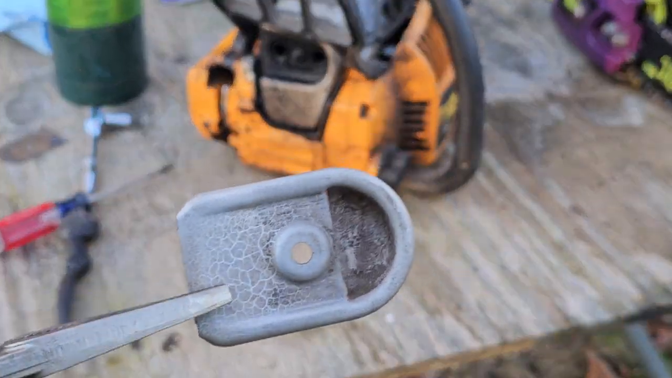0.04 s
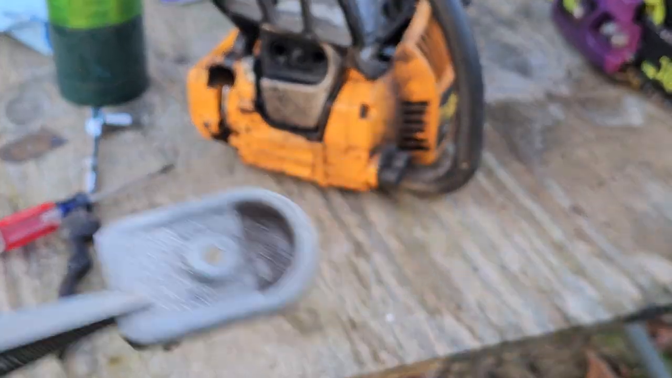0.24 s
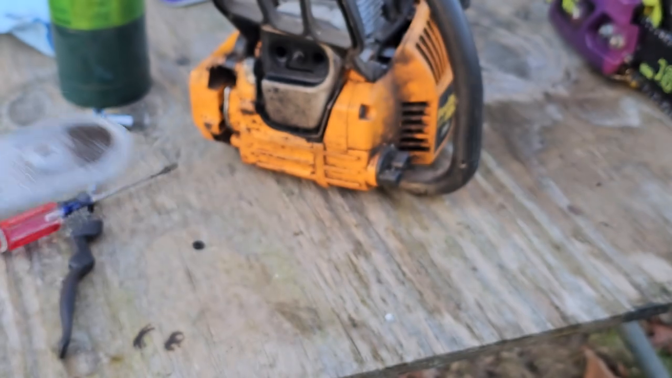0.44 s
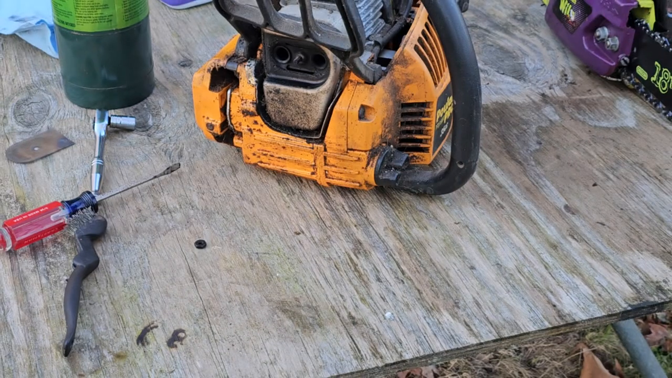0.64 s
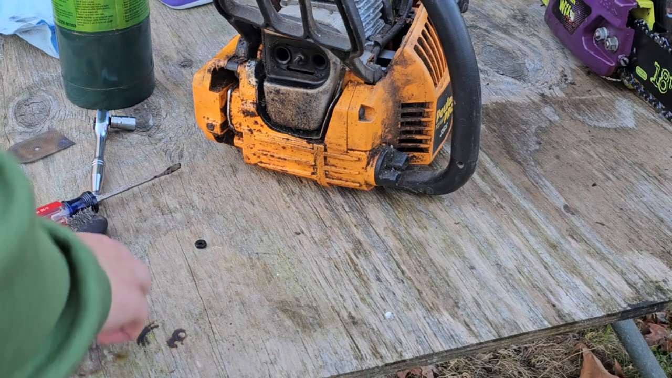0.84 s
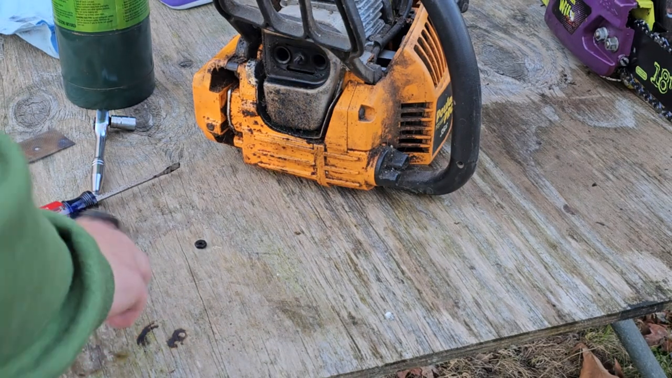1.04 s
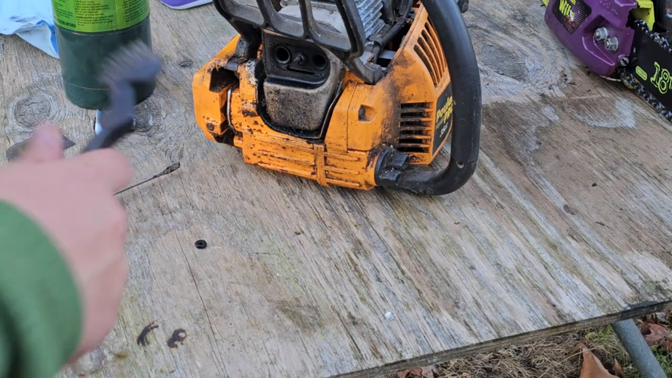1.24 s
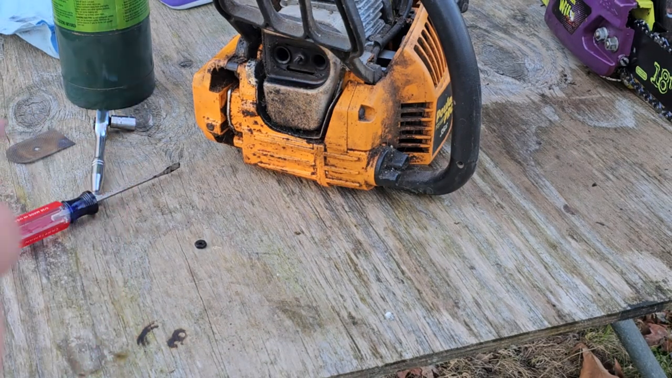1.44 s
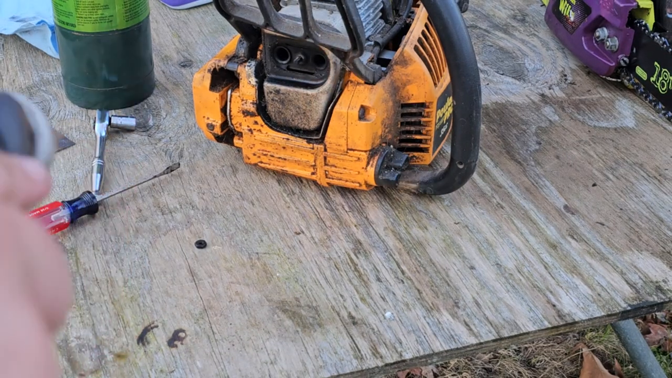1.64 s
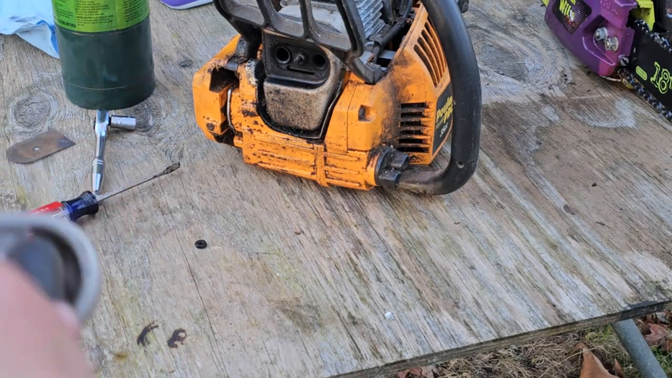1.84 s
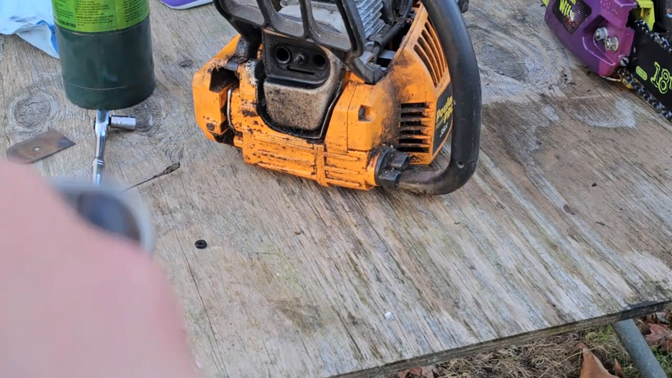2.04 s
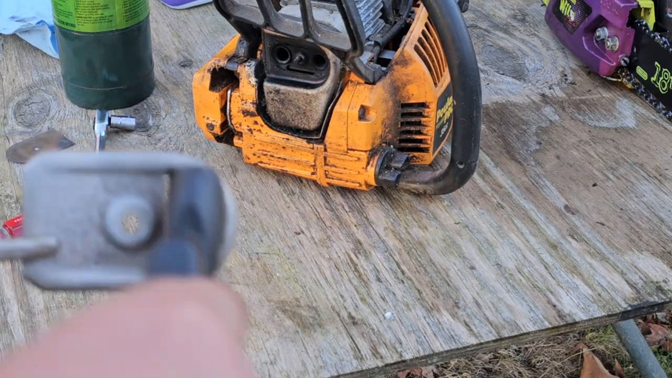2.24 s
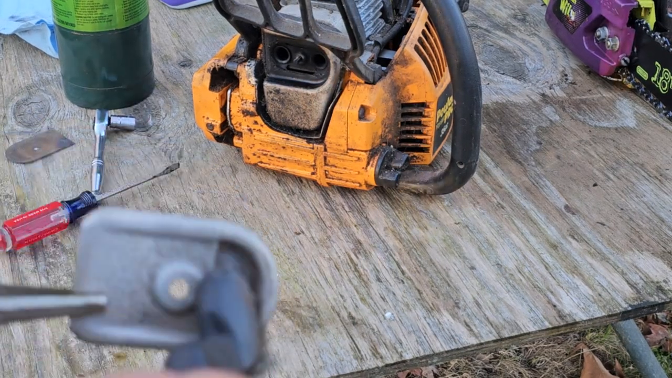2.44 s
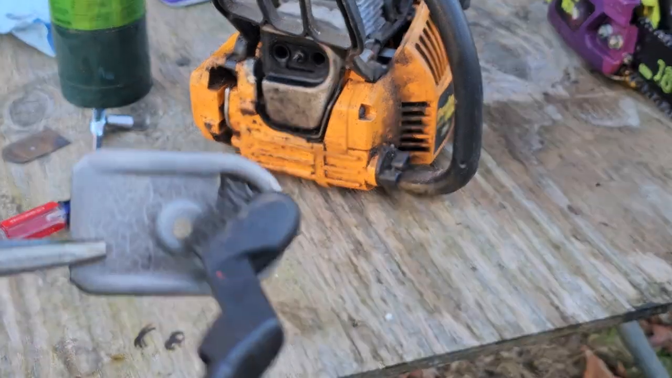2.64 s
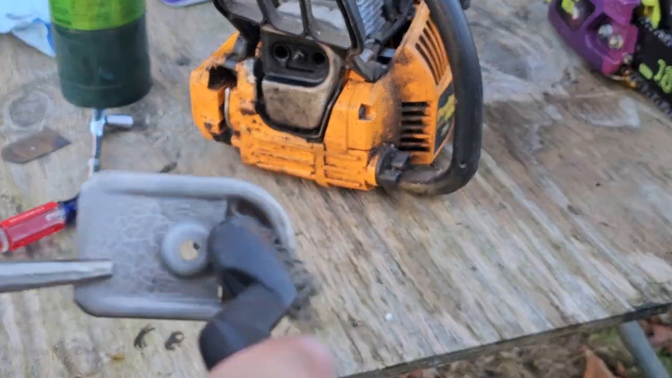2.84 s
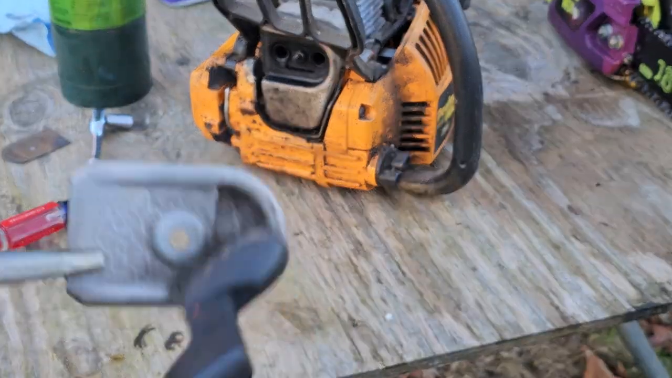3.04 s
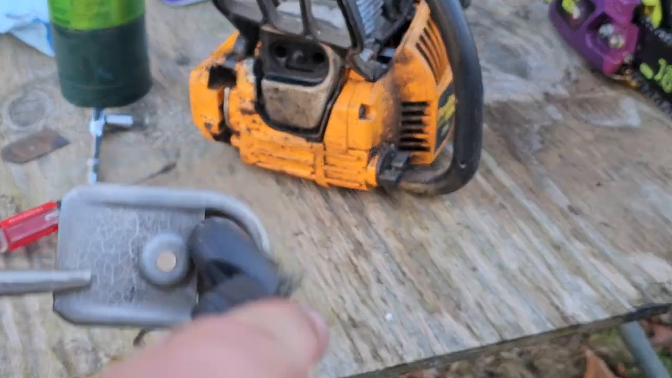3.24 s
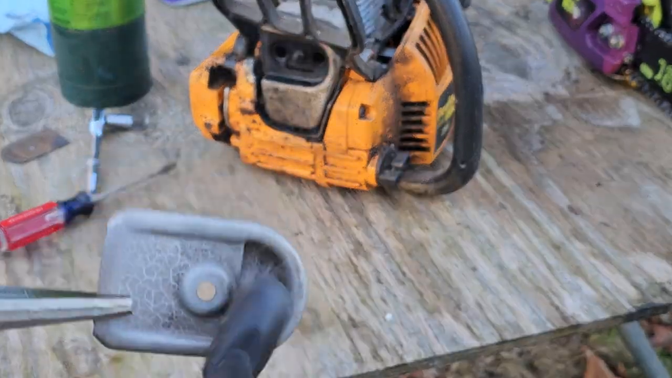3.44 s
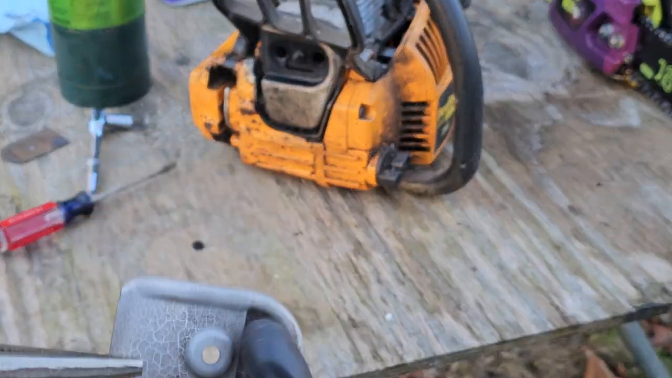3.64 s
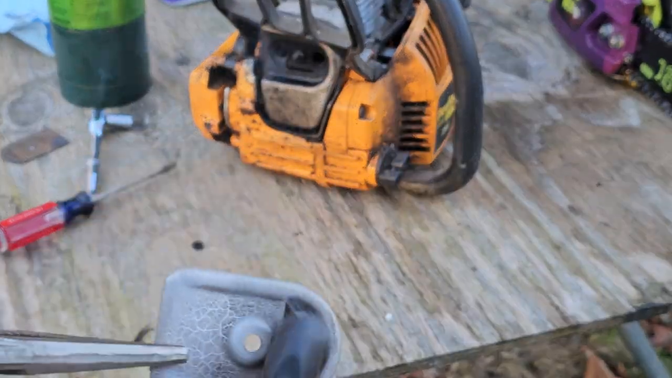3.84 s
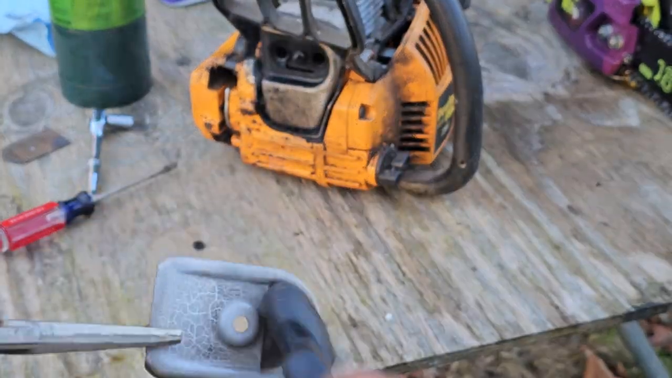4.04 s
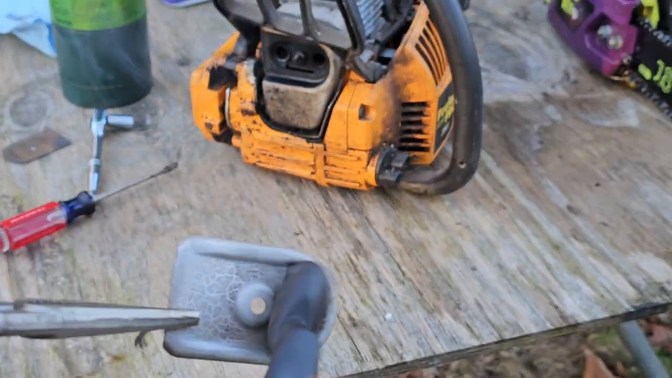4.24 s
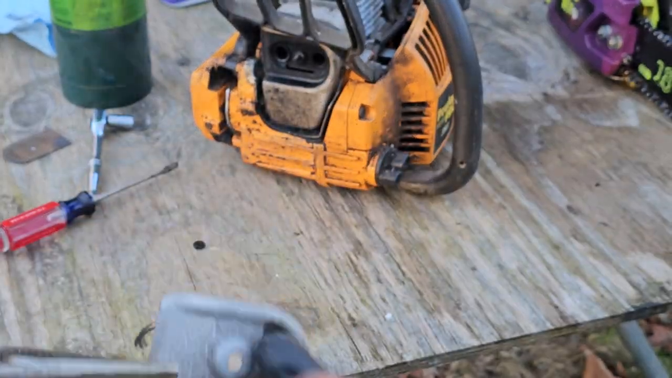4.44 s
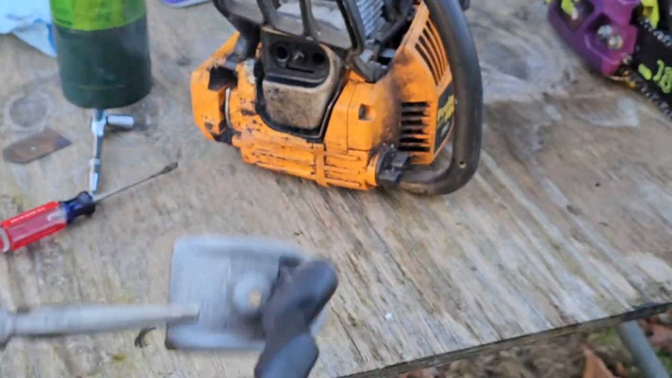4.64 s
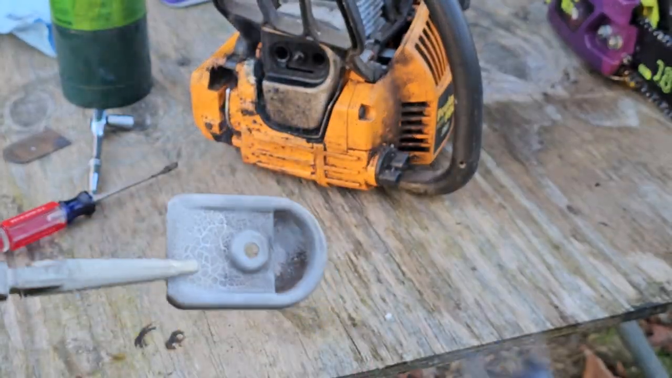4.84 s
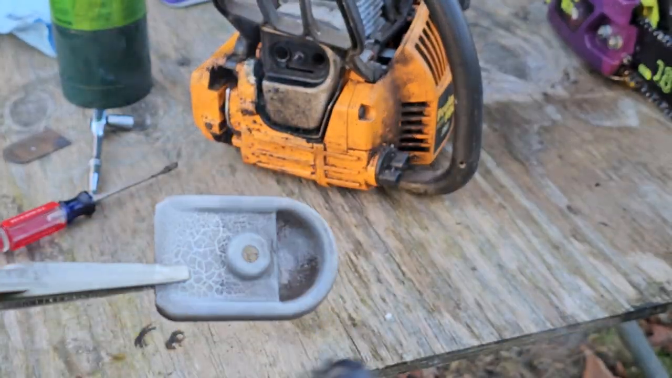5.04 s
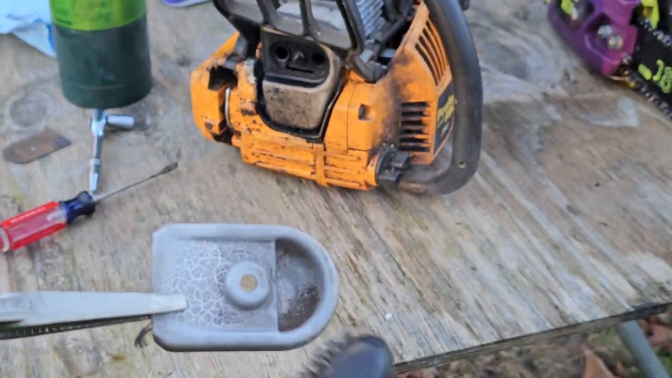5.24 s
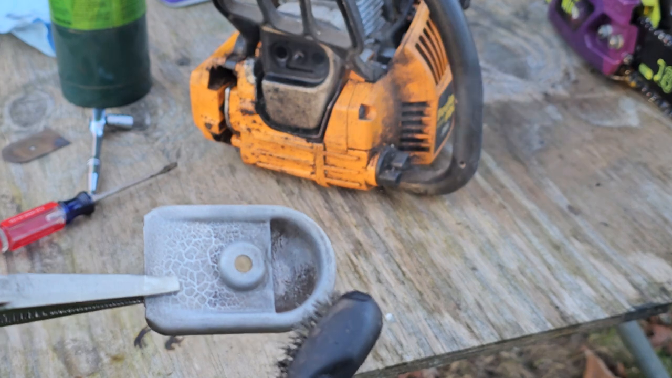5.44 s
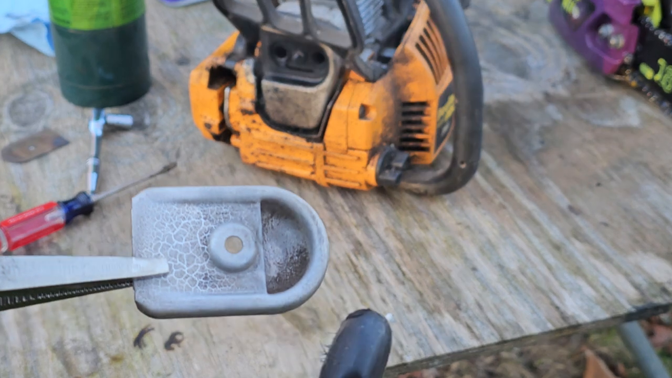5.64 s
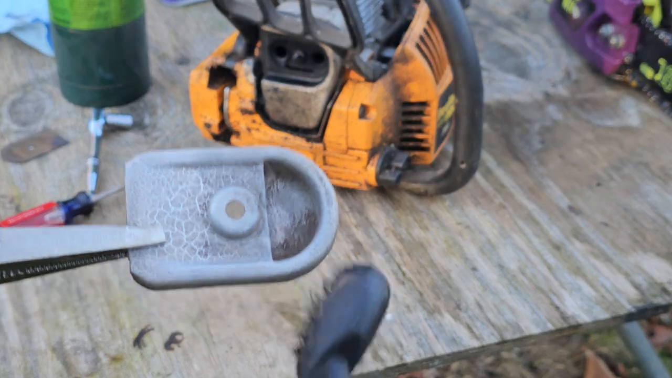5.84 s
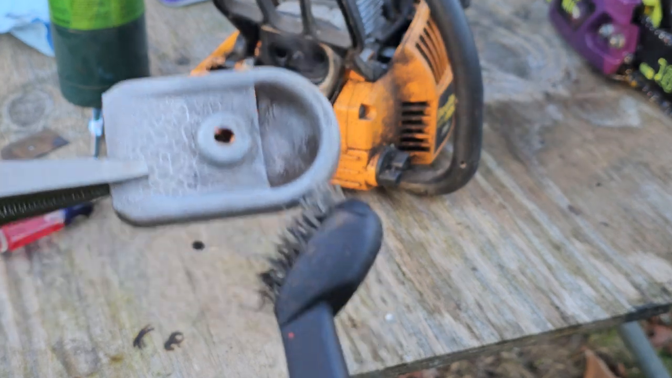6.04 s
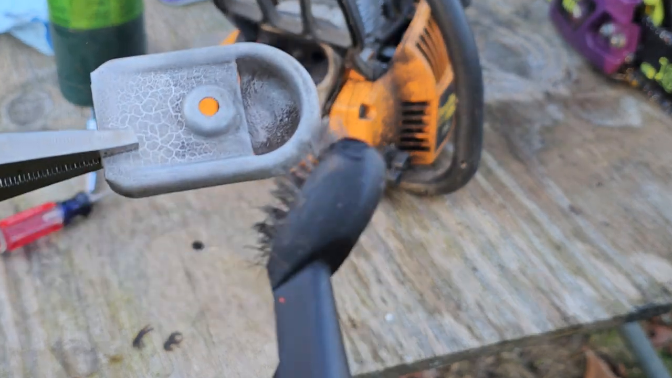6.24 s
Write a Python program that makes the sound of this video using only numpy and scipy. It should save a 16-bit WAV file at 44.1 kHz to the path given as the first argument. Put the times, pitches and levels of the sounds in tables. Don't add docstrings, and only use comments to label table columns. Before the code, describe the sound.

On an outdoor plywood bench, a low drone from a distant propeller plane slowly falls in pitch and fades. Cloth rustles, a brush handle rattles briefly on the wood, and small ticks follow. Light bristle touches grow into brisk, raspy wire-brush strokes on a thin steel cover, bright and metallic with irregular catches. The scrubbing stops, leaving the weakening drone and faint hiss. A close stereo phone hears the brush somewhat to the left.

```python
import sys
import numpy as np
from scipy import signal
from scipy.fft import rfft, irfft, next_fast_len
from scipy.io import wavfile
from scipy.ndimage import uniform_filter1d, map_coordinates

SR = 44100
rng = np.random.default_rng(int(sys.argv[2]) if len(sys.argv) > 2 else 0)


def boost(x):
    u = np.asarray(x, float) / 20
    return 10 ** u


def persist_wave(psi):
    counts = np.round(np.clip(psi, -1, 1) * 32767).astype(np.int16)
    wavfile.write(sys.argv[1], SR, np.atleast_2d(counts).T)


N = 278182
TIME = np.arange(N) / SR
FAST = next_fast_len(N)
FREQ = np.maximum(np.fft.rfftfreq(FAST, 1 / SR), 1)


def level(x, db):
    return x * boost(db) / np.sqrt(np.mean(x ** 2))


def curve(table):
    return np.interp(TIME, *np.transpose(table))


def colour(x, points):
    hz, db = np.transpose(points)
    gain = boost(np.interp(np.log(FREQ), np.log(hz), db))
    return irfft(rfft(x, FAST) * gain, FAST)[..., :N]


def ring(x, hz, width):
    quality = hz / np.clip(width, 1, SR / 4)
    return signal.lfilter(*signal.iirpeak(hz, quality, SR), x)


def walk(rate):
    k = int(SR / rate)
    held = np.repeat(rng.standard_normal(N // k + 1), k)
    return 2.15 * uniform_filter1d(uniform_filter1d(held, k), k)[:N]


def late(x, samples):
    return map_coordinates(x, [np.arange(N) - samples], order=3, mode="nearest")


def wide(points, lag, half_hz):
    left, other = rfft(rng.standard_normal((2, FAST)))
    alike = 1 / (1 + (FREQ / half_hz) ** 2)
    delayed = left * np.exp(-2j * np.pi * FREQ * lag / SR)
    right = alike * delayed + np.sqrt(1 - alike ** 2) * other
    pair = irfft(np.array([left, right]), FAST)[:, :N]
    return level(colour(pair, points), 0)


def patchy(x, centres_hz, sharp, depth_db, rate):
    return sum(boost(depth_db * walk(rate)) * ring(x, hz, hz / sharp) for hz in centres_hz)


def hump(s, rise, fall):
    at = np.arange(max(int((s - rise) * SR), 0), min(int((s + fall) * SR), N))
    place = np.clip((TIME[at] - s) / np.where(TIME[at] < s, rise, fall), -1, 1)
    return at, place, np.cos(place * np.pi / 2)


def faded(table, fades):
    db = curve(table)
    for s, depth_db, half in fades:
        at, _, dip = hump(s, half, half)
        db[at] += depth_db * dip ** 2
    return db


# t/s, f/Hz
BLADE_RATE = [(0.0, 83.3), (0.07, 85.2), (0.16, 83.87), (0.68, 84.2), (1.03, 82.35), (4.3, 73.34),
              (4.92, 73.27), (5.04, 71.9), (5.5, 74), (5.62, 71), (6.25, 70.67), (6.31, 71.6)]
# t/s, level/dB
FIRST_TONE = [(0, -46.5), (.13, -38), (.35, -44), (.49, -35), (.75, -34.5), (.9, -35.5), (1.03, -29),
              (1.2, -32), (1.7, -31), (2.3, -30), (2.8, -32.5), (3.02, -31), (4.2, -32), (4.9, -33.5),
              (5.3, -34.5), (5.5, -40.5), (5.74, -34), (6.31, -46)]
SECOND_TONE = [(0.0, -50.5), (0.23, -76), (0.26, -57.5), (1.02, -48.5), (1.51, -62), (2.49, -51.5),
               (3.99, -51), (4.2, -59.5), (4.57, -48), (5.57, -44.5), (6.2, -53.5), (6.31, -66)]
THIRD_TONE = [(0, -57), (.3, -63), (1.05, -61), (1.3, -67), (1.7, -55.5), (2.2, -59.5), (2.4, -54.5),
              (2.9, -69.5), (4.2, -73.5), (6.31, -71)]
# t/s, depth/dB, half length/s
AIR_FADES = [
    [(1.25, -4, 0.042), (3.62, -4, 0.053), (6.2, -10.5, 0.046), (.246, -4, 0.037), (.41, -11, 0.077),
     (.558, -12, 0.054), (.66, -9, 0.093), (.87, -1.5, 0.12), (1.12, -5.5, 0.072), (1.5, -3, 0.058),
     (2.11, -5.5, 0.18), (2.44, -4, 0.077), (2.92, -7, 0.082), (3.35, -4, 0.047), (3.5, -4.5, 0.076),
     (3.76, -3.5, 0.047), (4.28, -5, 0.062), (4.474, -5.5, 0.024), (4.6, -4.5, 0.039), (4.86, -4, 0.084),
     (5.03, -3, 0.093), (5.28, -3, 0.038), (5.468, -3, 0.058), (5.564, -5.5, 0.042), (5.844, -4, .05),
     (5.95, -2.5, 0.032), (6.07, -3, 0.039)],
    [(.2, -12, 0.064), (1.45, -10, 0.044), (1.6, -23, 0.067), (1.93, -2, 0.048), (2.31, -6, .05),
     (2.61, -5, 0.063), (2.96, -6, 0.061), (3.49, -18, 0.048), (4.19, -12, 0.057), (5.95, -9.5, .05)],
]
# multiple of the blade rate, level against the roar/dB
HIGH_TONES = [(5, -25), (6, -9)]


def blade_tones(roar_db):
    phase = 2 * np.pi * np.cumsum(curve(BLADE_RATE)) / SR
    levels_db = [faded(FIRST_TONE, AIR_FADES[0]) + 0.44 * walk(25),
                 faded(SECOND_TONE, AIR_FADES[1]) + 0.73 * walk(14),
                 faded(THIRD_TONE, []) + 2.2 * walk(14)]
    tones = np.zeros(N)
    for k, db in enumerate(levels_db):
        strength = np.sqrt(2) * uniform_filter1d(boost(db), size=900)
        tones += strength * np.sin((k + 1) * phase + 0.13 * k ** 2 * walk(12))
    for k, db in HIGH_TONES:
        tones += boost(roar_db + db + 3 * walk(5)) * np.sin(k * phase + 1.2 * walk(12))
    return tones


# t/s, level/dB
ROAR_LEVEL = [
    (0.0, -56),
    (.6, -56),
    (1.3, -56.5),
    (1.9, -56),
    (2.93, -54.5),
    (4.36, -60.5),
    (4.9, -59),
    (5.16, -64),
    (5.9, -63.5),
    (6.31, -66.5),
]
# f/Hz, level/dB per Hz
ROAR_SPECTRUM = [(15, -38), (28, -16.5), (50, -10), (75, -9), (105, -12.5), (190, -27.5), (260, -24),
                 (340, -28.5), (480, -22), (800, -31.5), (1500, -37.5), (3000, -48), (5000, -56),
                 (8000, -91)]


def plane():
    roar_db = curve(ROAR_LEVEL)
    tones = blade_tones(roar_db)
    even = wide(ROAR_SPECTRUM, lag=14.7, half_hz=628.0)
    gusty = patchy(even, 25 * 2 ** np.arange(0, 8.6, .5), sharp=0.87, depth_db=2.5, rate=9)
    roar = level(gusty, 8.47) * boost(roar_db)
    ports = np.array([tones * boost(-1.35), late(tones, 7.3) * boost(-1.9)])
    return ports + roar * boost(np.array([[.6], [-.6]]))


# f/Hz, level/dB per Hz
HISS_SPECTRUM = [(3500, -24), (5500, -3.5), (8000, -15.5), (9000, -19), (10800, -20), (11200, 0.5),
                 (13500, -7.5), (15600, -5.5), (16500, -5.5)]


def hiss():
    noise = level(wide(HISS_SPECTRUM, lag=1, half_hz=100.), -85.5)
    return noise * boost(np.array([[2.5], [-3]]))


# fastest at t/s, rise/s, fall/s, level/dB
SLEEVE_MOVES = [(0, .05, 0.3, -76.5), (.55, 0.32, 0.26, -70.5), (.86, 0.35, 0.16, -65.5),
                (1.034, 0.021, 0.025, -68), (1.22, 0.55, 0.36, -74), (1.39, 0.019, 0.041, -71),
                (1.105, .008, 0.064, -80), (1.3, 0.094, 0.08, -83), (1.5, 0.2, 0.35, -76.5),
                (4.89, 0.099, 0.32, -75.5), (4.965, 0.018, 0.078, -68), (6.088, 0.016, 0.034, -79.5),
                (6.31, 0.24, 0.083, -80)]
# f/Hz, level/dB per Hz
CLOTH_SPECTRUM = [(880, -12), (1500, -5.5), (2220, -6.5), (3660, -11.5), (5310, -12), (6690, -16),
                  (7250, -8.5), (9310, -18), (15200, -5.5), (16000, -14), (16500, -36)]


def sleeve():
    swell = np.full(N, boost(-88))
    for s, rise, fall, db in SLEEVE_MOVES:
        at, _, speed = hump(s, rise, fall)
        swell[at] += boost(db) * speed ** 1.5
    rub = wide(CLOTH_SPECTRUM, lag=10.0, half_hz=900.) * boost(.8 * walk(40))
    return swell * rub * boost(np.array([[5.5], [-.5]]))


# t/s, peak level/dB, f/Hz, width/Hz
SMALL_TICKS = [(0.312, -72, 10810, 6000), (1.0234, -56, 2200, 1300), (1.033, -59, 2400, 2500),
               (2.1124, -43, 13000, 6000), (2.027, -45, 6500, 6004), (1.1, -79, 9000, 7900),
               (1.383, -69, 8090, 2000), (1.389, -52, 3946, 4520), (4.834, -45, 14140, 30.23),
               (4.962, -66, 5987, 8960), (4.971, -59, 6000, 8620), (5.173, -75, 6500, 1990),
               (5.414, -81, 10500, 2965), (2.436, -54, 1250, 300), (2.694, -43, 1050, 250),
               (3.603, -49, 1450, 300), (2.08, -51, 1050, 150), (4.659, -48, 1220, 201),
               (6.079, -58, 5650, 24.85), (6.083, -72, 8400, 890), (6.1, -72, 15560, 300),
               (6.101, -77, 9900, 35)]


def ticks():
    sound = np.zeros(N)
    for s, db, hz, width in SMALL_TICKS:
        at = int(s * SR)
        puff = rng.standard_normal(2000) * np.exp(-TIME[:2000] / 0.0016)
        band = ring(ring(puff, hz, 3 * width), hz, width)
        sound[at:at + 2000] += boost(db + 13.5) * band * np.sqrt(8000 / width)
    return np.array([sound, boost(-11.0) * late(sound, 11.0)])


# t/s, peak level/dB
HANDLE_BLOWS = [
    (1.025, -43.5),
    (1.028, -40.5),
    (1.035, -43),
    (1.043, -51),
    (1.048, -41.5),
]
# f/Hz, width/Hz, level/dB
PLYWOOD_MODES = [(214, 34, 17.5), (483, 43, 12), (704, 55, 7), (1020, 44, 6.5), (1300, 36, 2),
                 (1730, 270, -10), (2800, 1400, -45)]


def knocks():
    blows = np.zeros(N)
    for s, db in HANDLE_BLOWS:
        blows[int(s * SR)] = boost(db) * rng.choice([-1, 1])
    contact_s = .00006
    soft = np.exp(-.5 * (np.arange(-60, 61) / (contact_s * SR)) ** 2)
    blows = np.convolve(blows, soft / soft.sum(), "same")
    wood = boost(35.5) * sum(boost(db) * ring(blows, hz, width) for hz, width, db in PLYWOOD_MODES)
    return np.array([wood, boost(-2.0) * late(wood, 6.2)])


def flicks(rate, spread_db, length):
    strength_db = spread_db * np.minimum(rng.exponential(size=N), 4.5)
    size = (rng.random(N) < rate / SR) * boost(strength_db)
    return level(signal.lfilter([1], [1, -np.exp(-1 / (length * SR))], size), 0)


# fastest at t/s, rise/s, fall/s, pressure level/dB, bristle tips level/dB
BRUSH_STROKES = [(1.685, 0.025, 0.053, -51.5, -2), (1.8, 0.058, 0.043, -67, 9),
                 (1.889, 0.032, 0.1, -50, -3), (2.051, 0.05, 0.078, -57.5, 5),
                 (2.142, .055, 0.058, -53.5, 7.5), (2.21, 0.015, 0.029, -62, -3),
                 (2.321, 0.047, 0.16, -48, 6.5), (2.425, 0.018, 0.019, -51.5, 3),
                 (2.651, 0.18, 0.14, -40, 3.5), (2.799, 0.064, 0.12, -38, -7.5), (3.1, 0.16, 0.16, -42, 6),
                 (3.258, 0.073, .12, -38, 1), (3.542, 0.14, 0.12, -38, 1.5),
                 (3.706, 0.088, 0.091, -40, 0.5), (3.956, 0.09, .09, -40, 7), (4.103, 0.095, .12, -41.5, 4),
                 (4.343, 0.097, 0.084, -39, -3.5), (4.476, 0.056, 0.1, -41, 3.5),
                 (4.704, 0.077, 0.075, -37.5, -2), (4.79, 0.077, 0.037, -42.5, -8.5),
                 (4.84, 0.039, 0.014, -53.5, 16), (2.925, .04, 0.055, -57.5, 6.5),
                 (3.87, 0.015, 0.056, -53.5, 15.5), (1.995, 0.011, 0.046, -64, 18)]
# body/dB, low face/dB, high face/dB, rim/dB, finest tips/dB
STROKE_BEARING = [(0, -2, -2, 0, -2), (-10, -9, 3, 4, -5), (3.5, -.7, -1, -2, -.7), (-9, .7, -8, 2, .7),
                  (-15, 1, 6, -0.5, .7), (4, 1, 3, .7, -4), (1.2, -7, 0, 1.5, -1.5), (14, -7, -2, -6, -1.5),
                  (0, -0.9, 1, 0.2, -0.3), (-2.5, -1.5, 3, 1.3, -.7), (-1.5, -1, 2, -0.9, 2),
                  (-.7, 0.5, 1.5, -.7, -0.5), (0.5, -0.5, -2, -0.7, 2.5), (2.5, -3, -1.2, -1.3, 1),
                  (0.5, -2.5, -3.5, 0, 1.5), (2, 1, -2.5, 1.5, 1.5), (-2, 1.9, -0.5, 0.3, 2),
                  (-2, -1.9, -1.8, 0.3, .7), (0.2, -1.2, -.7, -2, 0.5), (1.5, 2, 4, -1.5, 1.5),
                  (0.5, -9, 0, 4, 1.5), (-7, -1.5, 1, 3, 0.5), (3, 0, -2.5, -2, -3), (-4, -2.5, 1, -9, 1)]
REST_PARTS = [0, 0.5, -0.5, 3, -1, -2.5]
PART_STREAM = [0, 1, 1, 2, 3, 3]
# level/dB, speed exponent, change along a stroke/dB
PART_DB = [-3, 0.54, 0.2, 3, -2.5, -2.5]
PART_SHARP = [1.6, 2.25, 2.25, 1.59, 2.2, 2.03]
PART_LEAN_DB = [-1.5, -1.5, -2, -2, -2, -2.5]


def pressure():
    first_touch_s, touch_s, lift_s = 1.672, 1.98, 4.855
    rest = boost(np.where(TIME > touch_s, -60.5, -71)) * (TIME > first_touch_s) * (TIME < lift_s)
    press = np.outer(boost(np.array(REST_PARTS)), rest)
    tips_share = np.array([0.31, 0.086, 0.25, 0.78])[PART_STREAM]
    for (s, rise, fall, db, tips_db), bearing_db in zip(BRUSH_STROKES, STROKE_BEARING):
        at, place, speed = hump(s, rise, fall)
        part_db = db + np.array(PART_DB) + tips_db * tips_share + np.insert(bearing_db, 4, 0)
        lean_db = np.outer(PART_LEAN_DB, place)
        press[:, at] += boost(part_db[:, None] + lean_db) * speed ** np.array(PART_SHARP)[:, None]
    return press


# t/s, peak level/dB, ring of the cover/dB, bright part/dB
TUFT_CATCHES = [(1.6702, -36, -2.5, -16), (1.8121, -31, -15.5, -11), (1.8734, -16.5, -41, -15.5),
                (1.9877, -45, -16, -6), (2.0284, -38.5, 7, -15), (2.0606, -32, -0.5, -14),
                (2.1129, -38, -19, -5), (2.4216, -31, -1, -9), (2.435, -31, -1, -9),
                (2.4981, -32.5, -8, -9), (2.5205, -27, -15, -9), (2.656, -21, -15, -11.5),
                (2.689, -16, -5.5, -12.5), (2.7834, -22.5, -11, -11.5), (2.8524, -25, -8, -13),
                (3.0199, -28, -20, -8), (3.107, -20.5, -6, -4), (3.1492, -23, -9, -9),
                (3.1596, -19.5, -8, -9), (3.2381, -21.5, -3, -10), (3.399, -32.5, -17, -7),
                (3.435, -29.5, -27, -14), (3.858, -32, -27, 1), (4.074, -25, -6, -20.5),
                (4.111, -19, -10, -0.5), (4.265, -28.5, -6.5, -13), (4.4382, -26, -18, -13),
                (4.471, -19.5, -7, -7), (4.6474, -34.5, -18, -7), (4.786, -16, -10, -11),
                (1.7267, -49.5, -19, -8), (1.7546, -51, -10, -5), (1.786, -48, -8, -11),
                 (1.889, -40, -10, -10), (2.05, -39, 4, -9), (2.097, -38, -3, -6), (2.2226, -41, -2, -13),
                 (2.257, -53, -3, -12), (2.2736, -41, -7, -9), (2.2914, -40, -1, -9),
                 (2.348, -33.5, -18, -9), (2.3657, -33, -7, -9), (2.5916, -26.5, -11, -10),
                 (2.7358, -31.5, -2, -10.5), (2.7484, -30, -5, -8.5), (2.7664, -24, -7, -11),
                 (2.7944, -26, -1, -13), (2.9162, -35, -18, -6), (2.9698, -41, -23, -3),
                 (2.9897, -35, -26, -5.5), (2.93, -36, -14, -10), (2.947, -37, -14, -10),
                 (3.355, -36, -14, -11), (3.37, -35, -14, -11), (4.18, -35, -14, -9),
                 (4.195, -35, -12, -10), (4.58, -40, -12, -10), (4.511, -31, -14, -7),
                 (3.295, -29.5, -13, -11), (3.4576, -24.5, -14, -11.5), (3.493, -25, -26, -9),
                 (3.566, -25, -9, -13), (3.659, -33, 1, -9), (3.701, -25.5, -1, -9.5),
                 (3.717, -27, -10, -12), (3.7677, -32, -11, -13.5), (4.001, -30, -10, -16),
                 (4.0588, -34.5, -4, -11), (4.2501, -38, -8, -9), (4.2814, -33, -18, -10),
                 (4.3327, -28, -2, -14), (4.4502, -28, -3, -17), (4.559, -34.5, -8, -11),
                 (4.6281, -43, -13, -2), (4.6684, -30, -26, -11), (4.695, -28, -4, -8)]


def catches():
    drive = np.zeros((len(PART_STREAM), N))
    t = TIME[:2000]
    grip = 1 - np.exp(-t / .0012)
    snap = 1.1 * np.exp(-t / 0.00032)
    for s, db, ring_db, bright_db in TUFT_CATCHES:
        at = int(s * SR)
        decay_s = 0.0051 * boost(0.14 * (db + 26.5))
        burst = boost(db - 13.5) * (grip * np.exp(-t / decay_s) + snap)
        stream_db = np.array([ring_db + 1.5, ring_db + 6.0, -1.5, bright_db + 8.0])
        drive[:, at:at + 2000] += np.outer(boost(stream_db)[PART_STREAM], burst)
    return drive


def joined(bands, edges_hz):
    above = [1] + [1 / (1 + (hz / FREQ) ** 12) for hz in edges_hz] + [0]
    spectra = rfft(bands, FAST)
    return irfft(sum((a - b) * x for a, b, x in zip(above, above[1:], spectra)), FAST)[:N]


def bristle_force():
    common = flicks(rate=1500.0, spread_db=3.5, length=0.003)
    own = np.array([flicks(rate=700., spread_db=3.0, length=.0014) for _ in range(4)])
    wires = flicks(rate=200.0, spread_db=2.0, length=0.000096)
    drive = (.5 * common + 0.59 * own[PART_STREAM] + 0.13 * wires) * pressure() + catches()
    edges_hz = [3280.0, 5000., 6500., 10500., 13000.]
    return np.array([joined(drive * rng.standard_normal(N), edges_hz) for _ in range(2)])


MODE_HZ = [1220, 2305, 2960, 3722, 4705, 5313, 5645, 7510, 7938, 9840, 11070, 11505, 12165, 13300, 14045,
           14610, 15260, 15585]
# width/Hz, level/dB
MODE_SHAPE = [(120, -12.5), (69, 0.5), (68.2, -4.5), (54, 2), (48, 3), (90, 2.5), (129, -5.5), (250, -6),
              (44.3, -13.5), (50, -6), (89.9, -13), (70, -4), (99, 0), (149, -10), (109.9, 1), (90, -10),
              (85, 0), (70.1, 2.5)]


def cover_modes(force):
    sound = 0
    for hz, (width, db) in zip(MODE_HZ, MODE_SHAPE):
        coupling_db = 4.6 * np.tanh(walk(26)) + 1.5 * np.tanh(walk(7))
        sound = sound + boost(db) * ring(force * boost(coupling_db), hz, width)
    return sound


# f/Hz, level/dB per Hz
SCRATCH_SPECTRUM = [(470, -26), (800, -29), (1690, -13), (2320, -5), (3220, -5.5), (3700, -4), (5480, -3.5),
                    (10300, -8), (15100, 2.5), (15900, -8), (16500, -20.5)]


def scratch(force):
    centres_hz = 900 * 2 ** np.arange(0, 4.3, .4)
    return patchy(colour(force, SCRATCH_SPECTRUM), centres_hz, sharp=2.81, depth_db=3.0, rate=23)


# t/s, lag of the right port/samples
COVER_LAG = [
    (1.8, 11.7),
    (2.7, 8.4),
    (3.2, 8.4),
    (3.6, 7.86),
    (4.0, 7.8),
    (4.6, 9.74),
]
# f/Hz, level/dB
RIGHT_RESPONSE = [(700, -15.5), (1300, 4), (2300, -11), (3600, -4), (4400, -5), (5000, -15.5), (5600, -6),
                  (7900, -7), (8900, -23.5), (9300, 3.5), (10200, -18.5), (11100, 6), (12800, -3),
                  (15500, -1.5)]


def brush():
    force = bristle_force()
    left, other = boost(10.5) * (cover_modes(force) + boost(-10.0) * scratch(force))
    alike = np.clip(.88 - .3 * FREQ / 12000, 0, 1)
    delayed = late(left, curve(COVER_LAG))
    mixed = alike * rfft(delayed, FAST) + np.sqrt(1 - alike ** 2) * rfft(other, FAST)
    right = irfft(mixed, FAST)[:N]
    return np.array([left, colour(right, RIGHT_RESPONSE)])


def scene():
    return plane() + hiss() + sleeve() + ticks() + knocks() + brush()


def top_cut(x):
    return signal.sosfilt(signal.butter(12, 17020, fs=SR, output="sos"), x)


def record(dry):
    top_hz = 15840
    cut = colour(dry, [(top_hz - 110, 0), (top_hz - 40, -9), (top_hz + 10, -11), (top_hz + 90, -70)])
    return top_cut(cut)


dry = scene()
out = record(dry)
persist_wave(out)
```